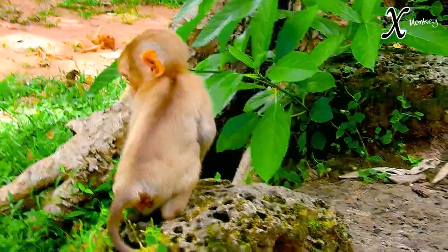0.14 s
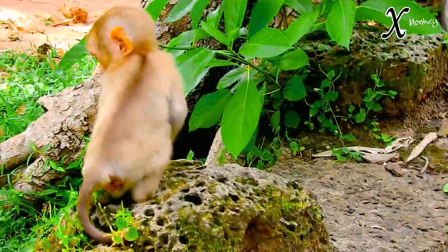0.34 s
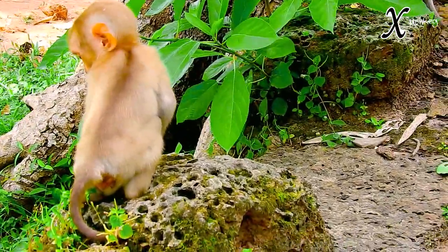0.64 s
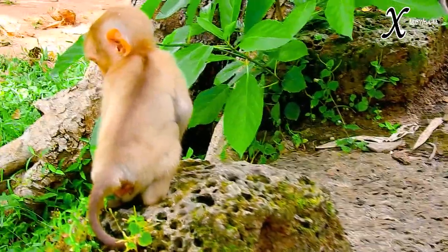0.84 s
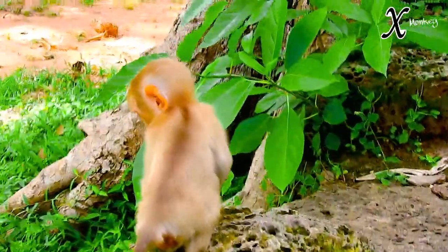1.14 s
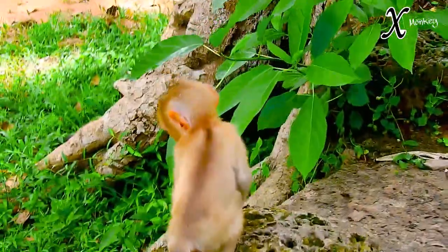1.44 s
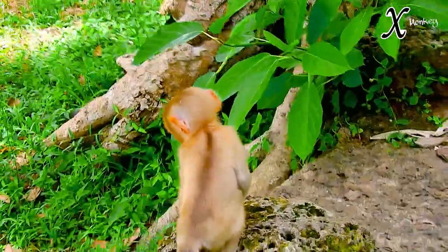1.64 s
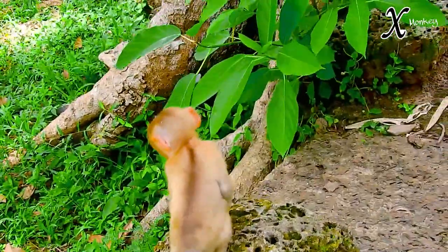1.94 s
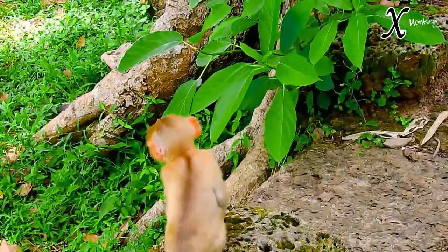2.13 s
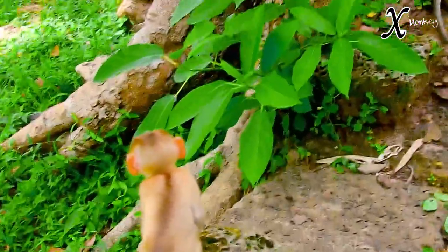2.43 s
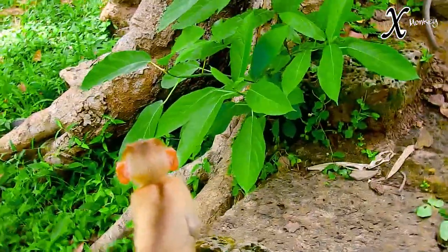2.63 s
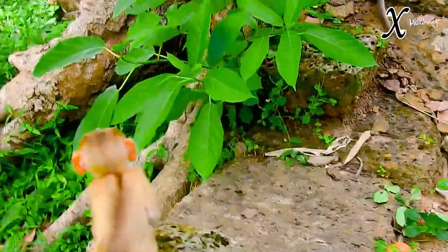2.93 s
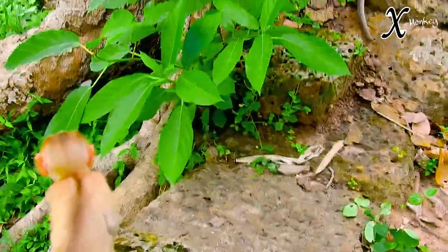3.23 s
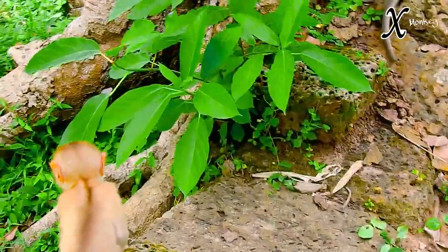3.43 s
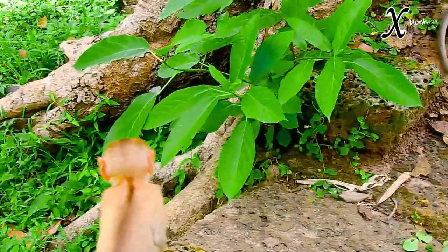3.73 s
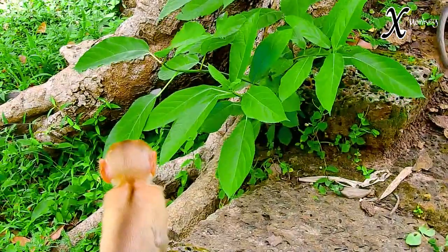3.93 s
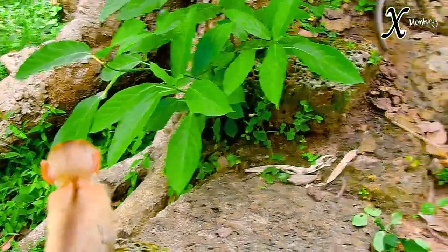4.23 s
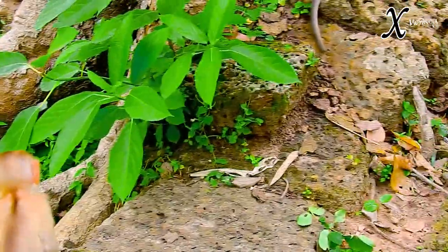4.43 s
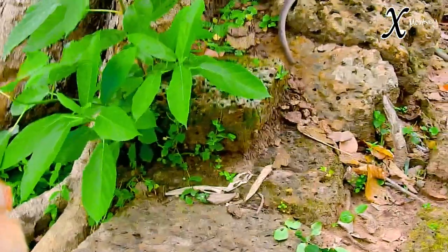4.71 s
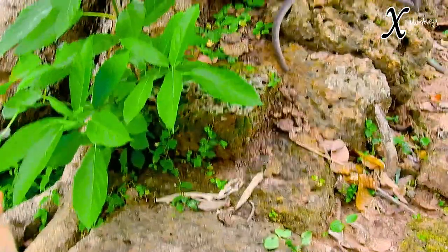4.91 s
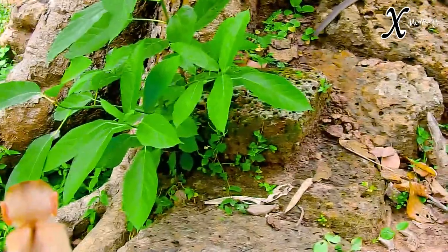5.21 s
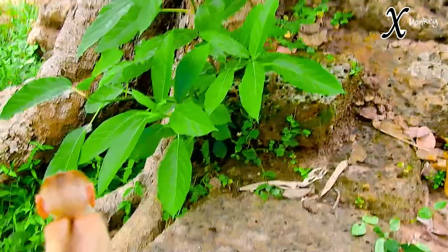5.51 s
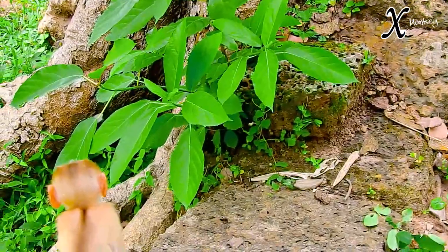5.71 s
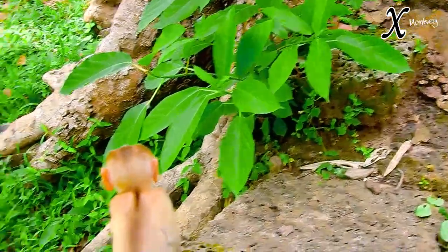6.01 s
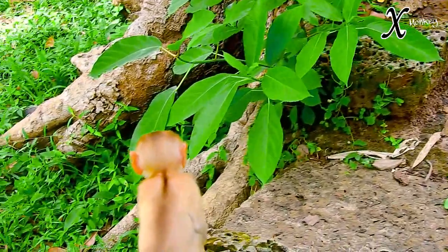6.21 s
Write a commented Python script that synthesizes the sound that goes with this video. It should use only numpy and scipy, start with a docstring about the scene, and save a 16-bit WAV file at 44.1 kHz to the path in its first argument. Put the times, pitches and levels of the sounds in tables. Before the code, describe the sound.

Outdoor woodland, hand-held stereo microphone with low wind thumps and a soft bed of noise. Three piercing, raspy monkey squeaks come in the first four seconds, each a rapid stutter and then a fall. Small rustles, snaps and dull knocks tick nearby, and faint thin animal calls sound far off. A small puttering vehicle comes steadily closer, hissing as it passes near the end.

```python
"""Among trees, close to a hand-held two-port microphone, a young monkey gives three trilled, falling chirps.
A one-cylinder engine, built from the overtones of its firing, draws closer with a wide noise roar and a hiss.
The chirps are smeared overtones coloured by a throat, with echoes off rock and trunks.
Noise makes the woods, wind lumps and rustles; dying rings make snaps and knocks; far calls are thin tones."""
import sys
import numpy as np
from scipy import signal
from scipy.fft import rfft, irfft
from scipy.io import wavfile
from scipy.ndimage import uniform_filter1d

SR = 44100
rng = np.random.default_rng(int(sys.argv[2]) if len(sys.argv) > 2 else 0)


def dump_mix(stems):
    """Bounce the given channels to the path in sys.argv[1] as a 16-bit WAV at rate SR."""
    frames = np.atleast_2d(stems).T  # one column per channel
    limited = np.clip(frames, -1, 1)  # hard clip at full scale
    pcm = np.round(limited * 32767).astype(np.int16)
    wavfile.write(sys.argv[1], SR, pcm)


N = 280387

# Colour of the monkey's throat. Each row: frequency in Hz, relative level in dB.
THROAT = [(2000, -48), (2700, -20), (3200, -7), (3900, -8.5), (4400, -22), (4950, 2.5), (5550, -0.5),
          (6400, 6), (7100, 0.5), (7800, -2), (8800, -7.5), (10000, -20.5), (11000, -17.5), (12300, -28),
          (14000, -82)]
# Level between the ports for distant sounds. Each row: frequency in Hz, left minus right in dB.
PORT_PAN = [(60, 2.6), (350, 4.1), (2040, 3.5), (11900, 1.08)]
# Phase between the ports for distant sounds. Each row: frequency in Hz, lead of the left in radians.
PORT_LEAD = [(300, 0.011), (2000, 0.7), (5000, 0.377), (9400, 4.1)]


def gain_of(db):
    """Decibels to gain."""
    return 10 ** (np.asarray(db) / 20)


def evened(x):
    """Scales to rms 1."""
    return x / np.sqrt(np.mean(abs(x) ** 2) + 1e-20)


def read(points, hz):
    """Reads a table on a log-frequency axis."""
    f, value = np.transpose(points)
    return np.interp(np.log(hz + 1), np.log(f + 1), value)


def add(mix, s, sound):
    """Mixes a sound in at time s."""
    part = mix[..., round(s * SR):][..., :sound.shape[-1]]
    part += sound[..., :part.shape[-1]]


def sway(count, hz):
    """Complex noise of rms 1, low-passed so that it wanders about hz times a second."""
    z = rng.standard_normal(count + 2000) + 1j * rng.standard_normal(count + 2000)
    lowpass = signal.butter(4, min(hz, 15000), fs=SR, output="sos")
    return evened(signal.sosfilt(lowpass, z)[2000:])  # the filter has settled by then


def panned(x, db):
    """Places a mono sound between the ports by level alone."""
    return x * gain_of([[db / 2], [-db / 2]])


def ports(x, pan, lead):
    """One sound as the two ports hear it: level and phase differ by frequency."""
    hz = np.fft.rfftfreq(N, 1 / SR)
    half = gain_of(read(pan, hz) / 2) * np.exp(.5j * read(lead, hz))
    return irfft(rfft(x) * np.array([half, 1 / half]), N)


def wash(spectrum, patchy_db):
    """Wide noise with drifting patches, partly alike in both ports."""
    # Likeness of the ports. Each row: frequency in Hz, likeness from 0 to 1 (below 0 counts as 0).
    likeness = [(60, 0.87), (230, 0.97), (840, 0.92), (3170, 0.88), (11900, -0.84)]
    frames, hz = N // 256 + 5, np.fft.rfftfreq(1024, 1 / SR)
    a, b, c, d, patches = rng.standard_normal((frames, 513, 5)).T
    patches = uniform_filter1d(patches, size=10, axis=0)  # over frequency
    patches = evened(uniform_filter1d(patches, size=12, axis=1))  # over time
    same = np.clip(read(likeness, hz), 0, 1)[:, None]
    left = a + 1j * b
    right = same * left + np.sqrt(1 - same ** 2) * (c + 1j * d)
    half = (gain_of(read(PORT_PAN, hz) / 2) * np.exp(.5j * read(PORT_LEAD, hz)))[:, None]
    z = np.array([left * half, right / half])
    z *= gain_of(read(spectrum, hz)[:, None] + patchy_db * patches)
    return evened(signal.istft(z, nperseg=1024, noverlap=768)[1][:, :N])


def engine():
    """Overtones of the firing rate add up to pops; each swells, sinks and slips, as echoes on the way would do."""
    # The engine speeds up and comes nearer. Each row: time in seconds, firings a second, exhaust level in dB.
    speed = [(0, 23.3, -66), (3.3, 28.55, -56), (4.2, 30.15, -51), (4.8, 31.25, -45), (5.4, 31.9, -40.5),
             (5.75, 32.15, -38), (6.36, 31.7, -40.5)]
    # Colour of the exhaust. Each row: frequency in Hz, relative level in dB.
    exhaust = [(30, -22), (60, 0), (190, -1), (230, -7), (350, -8), (480, -13), (700, -17), (1000, -27)]
    # Single overtones stand out by turns as it moves.
    # Each row: start in seconds, end in seconds, multiple of the firing rate, extra level at mid-span in dB.
    bright = [(3.4, 4.75, 12, 7), (4.8, 5.45, 17, 9), (5.2, 5.8, 9, 4), (5.6, 6.3, 20, 3.5),
              (5.6, 6.5, 6, 5)]
    t = np.arange(N) / SR
    slow = np.arange(N // 100 + 2) * 100 / SR  # one value every 100 samples
    s, *columns = np.transpose(speed)
    rate, exhaust_db = (np.interp(slow, s, c) for c in columns)
    uneven = 1 + .004 * sway(N, 5.).real
    turns = np.cumsum(np.interp(t, slow, rate) * uneven) / SR
    pops = np.zeros(N)
    for k in range(1, 32):
        height = min(k / 15, 1)
        drift = sway(len(slow), 250.)  # read at the slow rate: about 2.5 turns a second
        flicker = sway(len(slow), 1500.).real  # likewise about 15 a second, strongest in high overtones
        level_db = exhaust_db + read(exhaust, k * rate) + 4.0 * drift.real + 3.5 * height * flicker
        for start, end, multiple, extra_db in bright:
            if multiple == k:
                arch = np.clip(4 * (slow - start) * (end - slow) / (end - start) ** 2, 0, 1)
                level_db = level_db + extra_db * np.sqrt(arch)
        slip = height ** 2 * (2.5 * drift.imag + 3 * rng.uniform(-1, 1))  # low overtones keep the thump
        phase = 2 * np.pi * k * turns - 0.1615 * k ** 1.291 + np.interp(t, slow, slip)
        pops += np.interp(t, slow, gain_of(level_db)) * np.cos(phase)
    return ports(pops, PORT_PAN, PORT_LEAD)


def roar():
    """Tyres, chain and air: wide noise that grows as the engine nears."""
    # Rise of the roar. Each row: time in seconds, level in dB.
    approach = [(0, -49.5), (1.35, -50.5), (3.3, -45.5), (4.3, -43), (5.4, -37.5), (5.75, -34.5),
                (6.05, -35.5), (6.36, -35.5)]
    # Colour of the roar. Each row: frequency in Hz, relative level in dB.
    colour = [(35, -26), (60, 2.5), (170, -8.5), (300, -18.5), (650, -18.5), (1100, -21.5), (2200, -28),
              (4200, -27), (6000, -20.5), (7800, -28), (12300, -59.5)]
    level_db = np.interp(np.arange(N) / SR, *np.transpose(approach))
    return gain_of(level_db) * wash(colour, patchy_db=1.6)


def woods():
    """The woods all around: a steady, patchy bed of noise."""
    # Colour of the woods. Each row: frequency in Hz, relative level in dB.
    colour = [(18, -35), (30, -39), (71, 7.5), (162, 5.5), (225, -11.5), (297, -9), (372, -38), (1100, -23),
              (1770, -25.5), (3780, -31), (4070, -50), (6570, -24), (12300, -70), (16000, -83),
              (22000, -120)]
    return gain_of(-42) * wash(colour, patchy_db=2.0)


def wind():
    """Low noise lumps, unrelated at the two ports, and single thumps of a wavering low tone."""
    # Wind thumps on the ports. Each row: start in seconds, level before panning in dB, pitch in Hz,
    # left minus right in dB, length in seconds.
    gusts = [(0.127, -27, 77, 9, 0.042), (0.295, -17, 94.4, 4, 0.055), (0.343, -21.5, 72.7, 9, 0.094),
             (1.338, -19.5, 81, -3, 0.04), (1.588, -21, 97.4, 7.5, 0.046), (1.624, -20, 104, 5, 0.057),
             (1.663, -21.5, 187, 0, 0.046), (1.687, -21.5, 80, 3, 0.057), (1.738, -24.5, 77.7, 7.5, 0.07),
             (3.947, -26.5, 83, -5, 0.064), (4.009, -23.5, 114, 2, 0.057), (6.199, -30, 64.4, -1, 0.16)]
    t = np.arange(N) / SR
    out = np.zeros((2, N))
    for port in range(2):
        lumps = (sway(N, 47.0) * np.exp(2j * np.pi * 130.0 * t)).real
        out[port] = lumps * gain_of(-48.5 + 6.0 * sway(N, 4.3).real)
    for s, db, hz, pan_db, length in gusts:
        t = np.arange(0, length, 1 / SR)
        flap = np.array([np.sin(2 * np.pi * hz * t + 1.69 * sway(len(t), 16.7).real) for port in range(2)])
        add(out, s, panned(gain_of(db) * flap * signal.windows.tukey(len(t), .6), pan_db))
    return out


def ring(db, hz, t60, pan_db):
    """One dying ring: the higher its pitch, the rougher and wider it is."""
    t = np.arange(0, t60, 1 / SR)
    rough = np.clip(hz / 3000, 0, 1)
    waver = max(rough, 0.26)  # low rings waver at least this much
    tone = np.exp(2j * np.pi * hz * t) * (1 - rough + waver * sway(len(t), 0.19 * hz))
    crack = 0.1 * rng.standard_normal(len(t))
    rise = np.minimum(t / 0.0042, 1) ** 2
    return panned(gain_of(db - 60 * t / t60) * rise * (tone.imag + rough * crack), pan_db)


def knocks():
    """Dull knocks on wood: several modes ring together, each with its own level and decay."""
    # Each row: start in seconds, level before rise and panning in dB, lowest ring in Hz,
    # share of the modes' ring time, left minus right in dB, tilt of the upper modes in dB an octave.
    knock_rows = [(.309, -34, 330, 0.32, 15, -13), (2.767, -27.5, 252, 0.42, 4, 3.5),
                  (2.782, -24, 228, 1.22, 5, 1.5), (2.802, -45.5, 225.4, 2.4, 0, 5.5),
                  (4.588, -14.5, 285, 0.33, 10, -2)]
    # Modes of the wood. Each row: multiple of the lowest ring, relative level in dB, t60 at share 1 in seconds.
    modes = [(1, 1.5, 0.13), (2.3, -18, 0.028), (3.65, -7.5, 0.072), (4.6, -11, 0.05), (5.4, -8.5, 0.024)]
    out = np.zeros((2, N))
    for s, db, hz, share, pan_db, tilt_db in knock_rows:
        for k, mode_db, t60 in modes:
            add(out, s, ring(db + mode_db + tilt_db * np.log2(k), hz * k, t60 * share, pan_db))
    return out


def snaps():
    """Twigs snap: very short rough rings, ticking on either side."""
    # Each row: start in seconds, level before rise and panning in dB, ring in Hz, left minus right in dB.
    snap_rows = [(2.37, -16, 2630, 18), (2.38, 10, 6500, 8.5), (2.766, -24, 2600, -9),
                 (2.767, -18, 1690, -6), (2.777, -23, 4570, 3), (2.795, -23, 5120, -12),
                 (3.156, -17, 2270, .5)]
    out = np.zeros((2, N))
    for s, db, hz, pan_db in snap_rows:
        add(out, s, ring(db, hz, 0.0099, pan_db))
    return out


def rustles():
    """Leaves rustle: grainy bands of noise that swell and fade."""
    # Each row: start in seconds, length in seconds, centre in Hz, width in Hz, rms before the swell in dB.
    rustle_rows = [(0.317, 0.19, 6330, 4130, -52.5), (0.399, 0.14, 1740, 340, -49),
                   (1.559, 0.11, 6820, 3630, -45.5), (1.893, 0.047, 6000, 4000, -44.5),
                   (2.276, 0.099, 5980, 3600, -42), (2.279, 0.062, 1510, 2520, -44),
                   (2.35, 0.08, 5560, 3800, -39.5), (2.976, 0.029, 2170, 1990, -50.5),
                   (3.142, 0.052, 3400, 500, -45.5), ]
    out = np.zeros(N)
    for s, length, hz, width_hz, db in rustle_rows:
        t = np.arange(0, length, 1 / SR)
        noise = sway(len(t), width_hz / 2) + sway(len(t), width_hz) / 2
        grain = gain_of(2.1 * sway(len(t), 190.0).real)
        band = (noise * np.exp(2j * np.pi * hz * t)).real * grain
        add(out, s, gain_of(db) * evened(band) * np.hanning(len(t)))
    return ports(out, PORT_PAN, PORT_LEAD)


def squeak(hz, rough, breath, mouth=1, waver=1):
    """Fundamental and overtones of a pitch curve; unsteady folds smear the overtones into bands and add breath."""
    rough, count = np.clip(rough, 0, 1), len(hz)
    turn = np.exp(2j * np.pi * np.cumsum(hz) / SR)
    # Rough folds throb unevenly, about 250 times a second, which chops the overtones into bursts.
    throbs = np.cumsum(250 * (1 + .3 * sway(count, 60.).real)) / SR
    flutter = gain_of(np.sqrt(rough) * 7 * np.cos(2 * np.pi * (throbs + rng.random())))
    # The fundamental stutters on and off and is smeared in pitch.
    stutter = gain_of(waver * 5 * sway(count, 110).real)
    low = stutter * turn * (1 + waver * .75 * rough * sway(count, 330))
    high = 0
    for k in range(2, 13):
        smear = 1 - rough + rough * sway(count, 180. * k)
        high = high + gain_of(read(THROAT, k * hz / mouth)) * turn ** k * smear
    steady = high.real / np.sqrt(uniform_filter1d(high.real ** 2, size=600) + 1e-12)  # level held even
    breathy = steady + .45 * rough * np.roll(breath, rng.integers(SR))[:count]
    return evened(low.real), evened(flutter * breathy)


def dulled(x, treble_db):
    """Turns the treble above 9100 Hz up or down."""
    body = signal.sosfiltfilt(signal.butter(3, 9100, fs=SR, output="sos"), x)
    return body + gain_of(treble_db) * (x - body)


def beat(out, row, rough, waver, breath, treble_db):
    """One beat of a chirp: it scoops up into its pitch, holds and sags; the fundamental swells ahead."""
    s, overtones_db, fundamental_db, length, hz = row
    lead_s, low_share = .0105, 0.61  # the fundamental's head start; its share of the beat's length
    t = np.arange(0, 2 * length, 1 / SR)
    sag, scoop = 0.0494 * t / length, 0.042 * np.exp(-t / 0.0026)  # as shares of the pitch
    low, high = squeak(hz * (1 - sag - scoop), rough, breath, waver=waver)
    hold = np.minimum(t / 0.0026, 1) * np.exp(-(t / length) ** 4)
    swell = np.minimum(t / 0.0067, 1) * np.exp(-(t / (low_share * length)) ** 4)  # rises more softly
    add(out, s - lead_s, gain_of(fundamental_db) * low * swell)
    add(out, s, gain_of(overtones_db) * dulled(high, treble_db) * hold)


def slide(out, row, breath):
    """The falling end of a chirp: treble fades first, the mouth closes, a chest resonance flares."""
    # Shape of every slide. Each row: time from its start at pace 1 in seconds, pitch as share of the top,
    # overtones in dB, fundamental in dB, both relative to the chirp's own levels.
    shape = [(0, 0.92, 3.5, -17), (.013, .8, -2, -7), (.024, .78, 0.5, -2.5), (.031, .67, -0.5, -6),
             (.038, .54, -3.5, -7), (.047, .5, -2, -3), (0.055, .42, -8.5, -9.5), (.075, .375, -10, -16),
             (0.093, .34, -17.5, -18.5), (0.108, 0.3, -36, -24), (.135, .26, -52, -31)]
    # The fundamental flares as it crosses this resonance: centre in Hz, width in Hz.
    chest_hz, chest_width_hz = (1580, 200)
    start, top_hz, high_db, low_db, pace, flare_db, treble_db = row
    s, *columns = np.transpose(shape)
    t = np.arange(0, s[-1] / pace, 1 / SR)
    share, overtones_db, fundamental_db = (np.interp(t * pace, s, c) for c in columns)
    mouth = 1 - 0.084 * (1 - share)  # closing lowers the throat's colour as the pitch falls
    low, high = squeak(top_hz * share, 0.82, breath, mouth, waver=.45)
    high = dulled(high, treble_db - 160 * t)  # dB a second
    rise = np.minimum(t / 0.0039, 1)
    fundamental_db += flare_db * np.exp(-((top_hz * share - chest_hz) / chest_width_hz) ** 2)
    add(out, start, rise * (gain_of(low_db + fundamental_db) * low + gain_of(high_db + overtones_db) * high))


def monkey():
    """Each chirp: a faint pip and three squeaks as separate beats, then a slide down."""
    # Opening beats, one list a chirp. Each row: start in seconds, overtones in dB, fundamental in dB
    # (both before shaping), length in seconds, pitch before scoop and sag in Hz.
    beat_rows = [
        [(.555, -43.5, -64, 0.016, 2770), (.588, -20, -32, 0.022, 3213), (.619, -16.5, -14, 0.018, 3408),
         (.645, -17, -27, 0.022, 3170)],
        [(1.926, -27, -65, 0.0078, 2990), (1.964, -16, -22.5, 0.042, 3402), (2.004, -13.5, -41, 0.014, 3130),
         (2.016, -16, -23.5, 0.031, 3190)],
        [(3.461, -37, -69, 0.015, 2710), (3.495, -15.5, -29.5, 0.0095, 3160),
         (3.527, -13.5, -18.5, 0.017, 3180), (3.558, -16.5, -28, 0.042, 3146)],
    ]
    # Roughness of the four beats, from 0 to 1.
    beat_rough = [0.9, 0.58, 1, 0.98]
    # Share of the fundamental's full wavering in the four beats.
    beat_waver = [.4, .45, .35, 1.3]
    # Closing slides. Each row: start in seconds, top pitch in Hz, overtones in dB, fundamental in dB,
    # pace (1 = as the shape), flare in dB, treble of the whole chirp in dB.
    slide_rows = [(.66, 3106, -18.5, -33.5, 1.11, 5.5, -5), (2.03, 3008, -18, -32.5, 0.94, 3.5, -1),
                  (3.574, 3066, -16.5, -27, .99, 7.5, -0.5)]
    # Bands lifted or lowered around the throat's colour. Each row: centre in Hz, width in Hz, level change in
    # dB.
    throat_touches = [(4100, 200, 2), (5620, 450, -3), (7840, 330, -3.5)]
    out = np.zeros(N)
    throat_gain = gain_of(read(THROAT, np.fft.rfftfreq(SR, 1 / SR)))
    breath = evened(irfft(rfft(rng.standard_normal(SR)) * throat_gain))
    for beats, slide_row in zip(beat_rows, slide_rows):
        for row, rough, waver in zip(beats, beat_rough, beat_waver):
            beat(out, row, rough, waver, breath, treble_db=slide_row[-1])
        slide(out, slide_row, breath)
    hz = np.fft.rfftfreq(N, 1 / SR)
    touch_db = sum(db * np.exp(-((hz - f) / width) ** 2) for f, width, db in throat_touches)
    return irfft(rfft(out) * gain_of(touch_db), N)


def echoes(x, decays, start):
    """Sparse echoes of random sign from sample start on, each band dying at its own speed."""
    taps = np.zeros((2, SR))
    at = np.arange(start, SR - 20, 20)
    at = at + rng.integers(0, 20, (2, len(at)))  # one echo somewhere in every 20 samples
    np.put_along_axis(taps, at, rng.choice([-1., 1.], at.shape), 1)
    hz, t, z = signal.stft(taps, SR, nperseg=256)
    decay = gain_of(-60 * t / read(decays, hz)[:, None])
    tail = signal.istft(z * decay, SR, nperseg=256)[1]
    tail = tail + 0.36 * tail[::-1]  # each port also hears some of the other's echoes
    tail = tail / np.linalg.norm(tail[0])
    return panned(signal.fftconvolve(x[None], tail, axes=1)[:, :N], 1.0)


def far_calls():
    """Animals further off: thin wavering tones, broken and smeared by the leaves."""
    # Each row: start in seconds, length in seconds, start pitch in Hz, end pitch in Hz,
    # level before smearing in dB, second partial relative to the first in dB.
    call_rows = [(.76, 0.33, 3380, 3420, -60, -30), (.78, 0.18, 3780, 3800, -63, -30),
                 (1.14, 0.21, 3840, 3900, -65, -30), (1.575, 0.1, 555, 610, -57, -1)]
    out = np.zeros(N)
    for s, length, start_hz, end_hz, db, second_db in call_rows:
        glide_hz = np.linspace(start_hz, end_hz, round(length * SR))
        turn = np.exp(2j * np.pi * np.cumsum(glide_hz) / SR)
        smear = 1 + 1.3 * sway(len(turn), 70.)
        tone = (turn + gain_of(second_db) * turn ** 2) * smear
        add(out, s, gain_of(db) * tone.real * signal.windows.tukey(len(turn), .6))
    return ports(out, PORT_PAN, PORT_LEAD)


def swish():
    """As the vehicle passes, two strands of hiss swell, fade and sink in pitch."""
    # The row: start in seconds, length in seconds, lower strand's first and last pitch in Hz, width in Hz.
    s, length, from_hz, to_hz, width_hz = (5.25, 1.05, 1900, 900, 750)
    count, out = round(length * SR), np.zeros(N)
    turns = np.cumsum(np.linspace(from_hz, to_hz, count)) / SR
    level_db = -47 + 4.0 * sway(count, 26.0).real
    hiss = 0
    for strand in (1, 1.45):  # multiples of the sliding pitch
        hiss = hiss + sway(count, width_hz / 2) * np.exp(2j * np.pi * strand * turns)
    add(out, s, gain_of(level_db) * evened(hiss.real) * np.hanning(count))
    return ports(out, PORT_PAN, PORT_LEAD)


def scene():
    """All sources at the microphone; the monkey and the small ticks are the near ones."""
    # Level of the voice between the ports. Each row: frequency in Hz, left minus right in dB.
    voice_pan = [(2000, 2.5), (6000, 2), (11000, 3)]
    # Phase of the voice between the ports. Each row: frequency in Hz, lead of the left in radians.
    voice_lead = [(2000, 0.1), (6000, 0.44), (11000, 2.5)]
    # Quick scatter off rock and roots close by. Each row: frequency in Hz, t60 in seconds.
    rocks = [(2000, 0.024), (4000, 0.098), (8000, 0.12), (10000, 0.068), (12000, 0.018)]
    # Echo among the trunks. Each row: frequency in Hz, t60 in seconds.
    trees = [(1900, 0.074), (2500, 0.35), (3250, 0.39), (4100, 0.35), (6000, 0.49), (9000, 0.39),
             (11500, 0.19)]
    voice, small = monkey(), knocks() + snaps()
    near = ports(voice, voice_pan, voice_lead) + small
    near += gain_of(-1.5) * echoes(voice + 0.21 * small.mean(0), rocks, 30)
    near += gain_of(-7.5) * echoes(voice, trees, 300)
    return near + engine() + roar() + woods() + wind() + rustles() + far_calls() + swish()


def record(dry):
    """The microphone drops the deepest bass and rounds the highest peaks; then the band ends at 12500 Hz."""
    thin = signal.sosfilt(signal.butter(3, 42., "high", fs=SR, output="sos"), dry)
    rounded = thin / (1 + abs(thin / .95) ** 4) ** .25
    band_limit = signal.firwin(511, 12500, window=("kaiser", 9), fs=SR)
    return signal.oaconvolve(rounded, band_limit[None], "same")


dry = scene()
out = record(dry)
dump_mix(out)
```